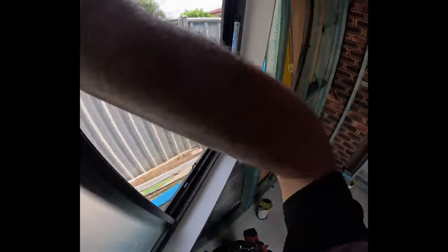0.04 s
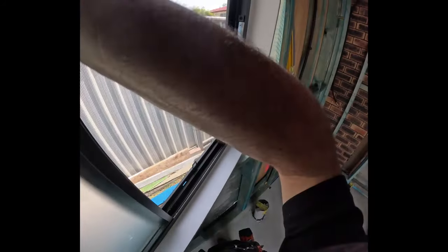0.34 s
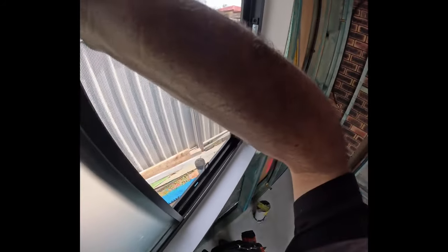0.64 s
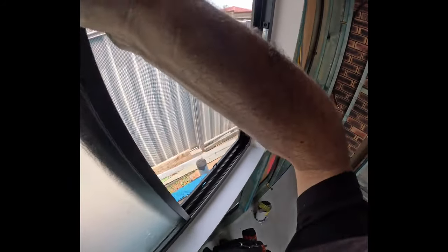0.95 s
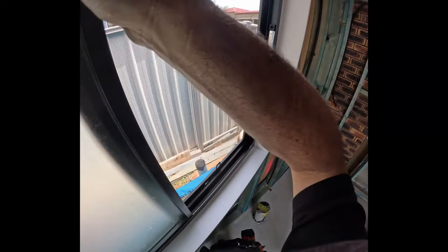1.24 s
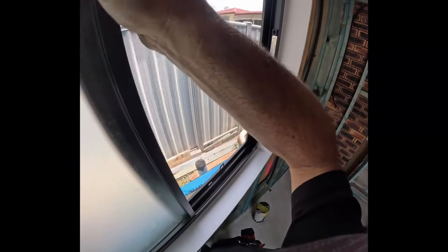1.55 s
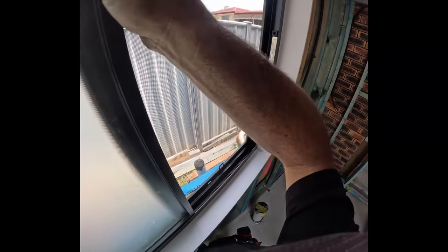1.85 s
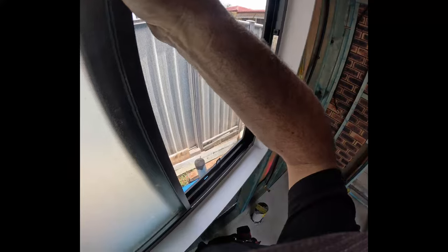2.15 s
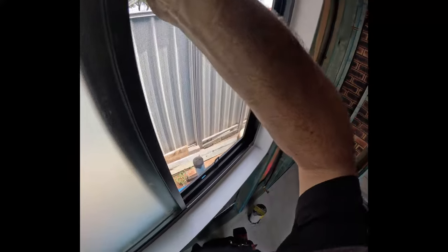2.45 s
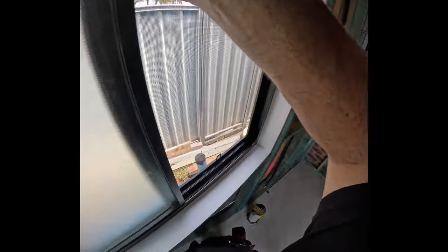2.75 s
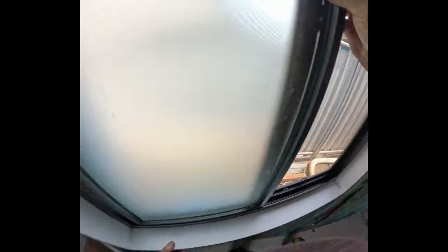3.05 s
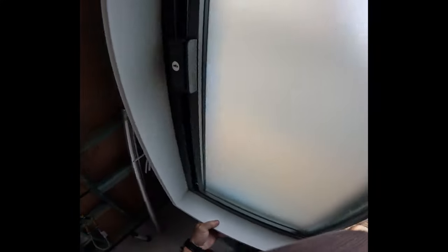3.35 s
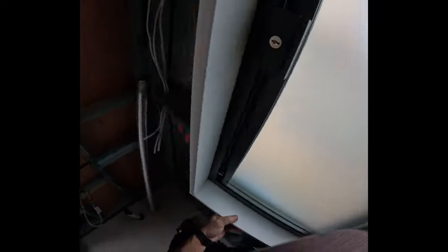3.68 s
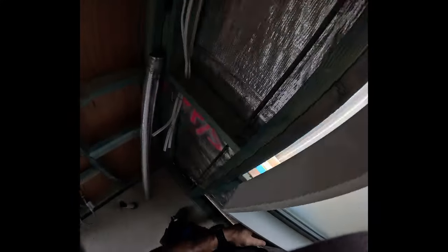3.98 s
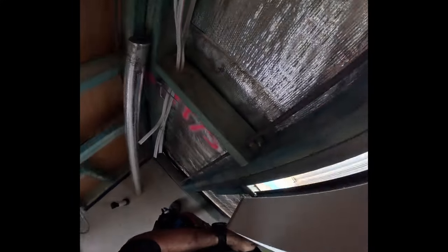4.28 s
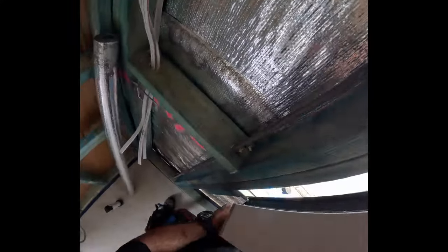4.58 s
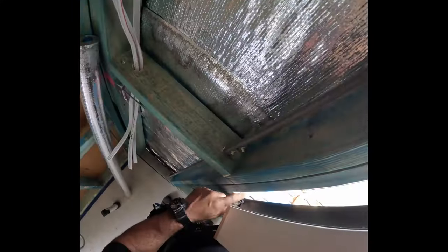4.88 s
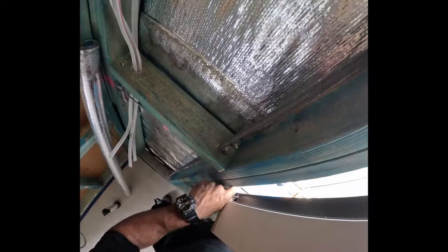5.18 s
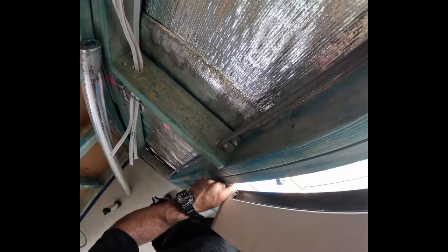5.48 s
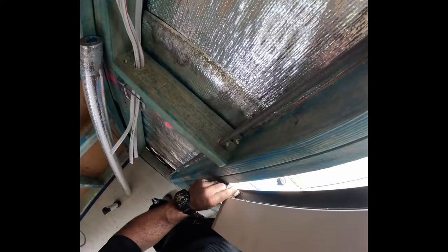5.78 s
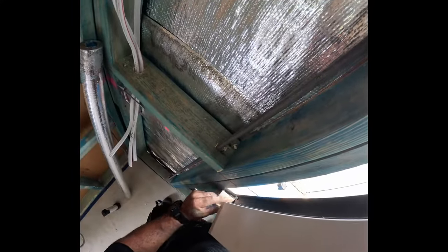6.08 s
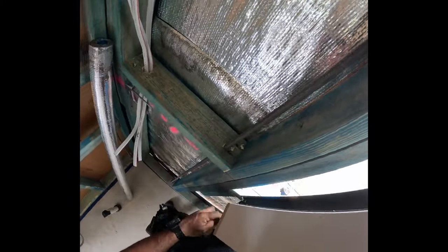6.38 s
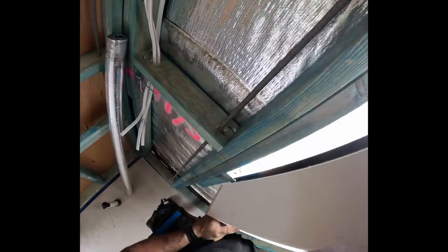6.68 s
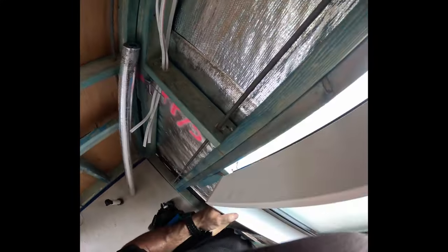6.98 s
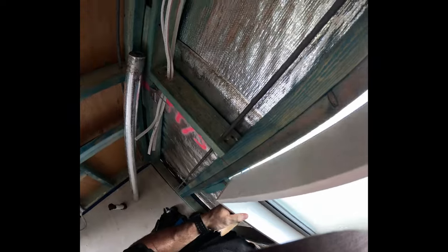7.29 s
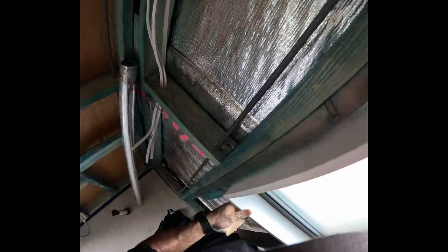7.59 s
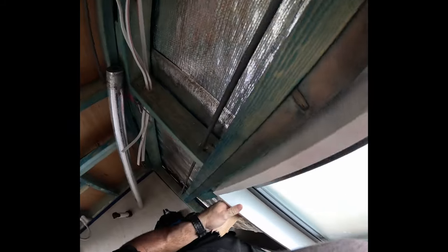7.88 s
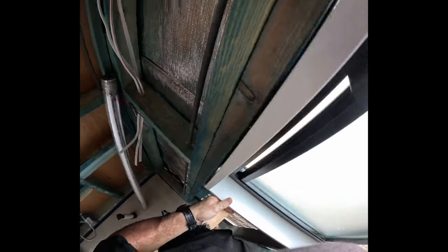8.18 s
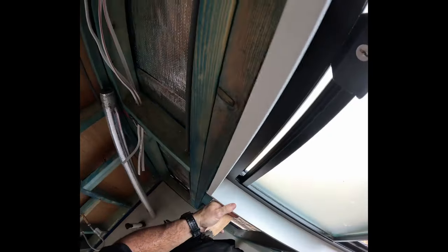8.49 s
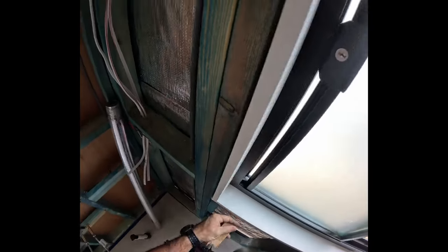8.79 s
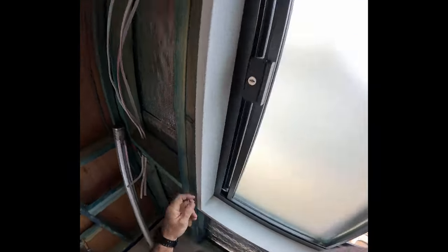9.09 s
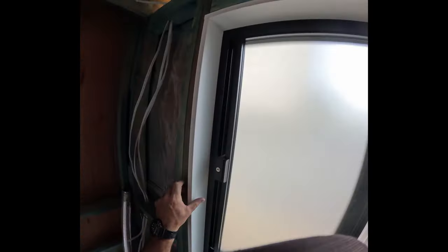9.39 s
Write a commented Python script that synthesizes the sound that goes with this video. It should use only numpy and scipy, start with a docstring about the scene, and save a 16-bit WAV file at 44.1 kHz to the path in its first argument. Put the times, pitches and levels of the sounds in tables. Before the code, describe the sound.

An aluminium window is fitted into a timber wall opening in a bare room with a low steady hum. A few dull knocks come first, then the sash glides in its track, bumps and gives short metallic chirps. Sleeves and hands rub close to a body-worn microphone. A cluster of heavy clunks makes the glass boom, and the frame scrapes home in two shoves with a thump between them, followed by light taps.

```python
"""An aluminium sliding window is lifted into a timber wall opening, close to a body-worn camera.
Impacts on the studs excite the damped modes of frame and wood, and the glass pane booms. The sash glides
and chirps in its track; by stick-slip friction the frame judders on the sill and scrapes home in two
shoves. Sleeves and hands rub near the microphone, over the low hum of a bare room."""
import sys
import numpy as np
from scipy import signal
from scipy.fft import rfft, irfft, next_fast_len
from scipy.io import wavfile

SR = 44100
rng = np.random.default_rng(int(sys.argv[2]) if len(sys.argv) > 2 else 0)


def transcribe(signal):
    """Save signal, clipped to [-1, 1], as a 16-bit WAV file at the path in sys.argv[1]."""
    frames = np.atleast_2d(signal).T
    limited = np.clip(frames, -1, 1)
    pcm = np.round(limited * 32767).astype(np.int16)
    wavfile.write(sys.argv[1], SR, pcm)


N = 425124
T = np.arange(N) / SR

def amp(db):
    return 10 ** (np.asarray(db) / 20)

def unit_rms(x):
    return x / np.sqrt(np.mean(x ** 2) + 1e-20)

def peaked(x, db):
    return amp(db) * x / abs(x).max()

def read(points, hz):
    """Interpolation on a logarithmic frequency axis."""
    f, value = np.transpose(points)
    return np.interp(np.log(hz + 1), np.log(f + 1), value)

def add(mix, s, sound):
    """Superposition: a sound joins the mix at s seconds."""
    part = mix[max(round(s * SR), 0):][:len(sound)]
    part += sound[:len(part)]

def level(s, db):
    """An amplitude envelope, silent outside its span."""
    return amp(np.interp(T, s, db, left=-120, right=-120))

def colour(x, spectrum):
    """Minimum-phase filtering to a given spectrum, at unit rms."""
    size = next_fast_len(len(x) + 4096)
    log_gain = np.log(amp(read(spectrum, abs(np.fft.fftfreq(size, 1 / SR)))))
    response = np.exp(np.conj(signal.hilbert(log_gain)))
    return unit_rms(np.fft.ifft(np.fft.fft(x, size) * response).real[:len(x)])

def resonate(x, hz, width, stages=2):
    """Unit-gain resonators in cascade, each `width` Hz wide; their centre may glide."""
    turn = np.exp(2j * np.pi * np.cumsum(hz * np.ones(len(x))) / SR)
    pole = np.exp(-np.pi * width / SR)
    for _ in range(stages):
        x = 2 * (turn * signal.lfilter([1 - pole], [1, -pole], x / turn + 1e-18)).real
    return x

def ring(modes, t):
    """Free vibration: a sum of damped modes, each falling 60 dB in its t60."""
    return sum(amp(db - 60 * t / t60) * np.sin(2 * np.pi * hz * t) * (-1) ** k
               for k, (hz, db, t60) in enumerate(modes))

def struck_anywhere(modes):
    """The point of impact sets how strongly each mode is excited."""
    return [(hz, db + 3 * rng.standard_normal(), t60) for hz, db, t60 in modes]

def diffuse_decay(t60s, size):
    """Densely overlapping modes or echoes act as noise whose bands decay at their own rates."""
    hz, t, bands = signal.stft(rng.standard_normal(size), SR, nperseg=256)
    return signal.istft(bands * amp(-60 * t / read(t60s, hz)[:, None]), SR, nperseg=256)[1][:size]

def friction(per_s, spread_db, clump_db, clump_s):
    """Friction as shot noise: tiny slips of uneven size that come in clumps."""
    slips = (rng.random(N) < per_s / SR) * rng.standard_normal(N)
    slips *= amp(spread_db * np.minimum(rng.exponential(1, N), 4))
    clumps = np.interp(T / clump_s, np.arange(N), rng.standard_normal(N))
    return unit_rms(slips * amp(clump_db * clumps))

def burst(decay_s):
    """One rough contact: exponentially decaying noise."""
    t = T[:SR // 4]
    return rng.standard_normal(len(t)) * np.exp(-t / decay_s)

def carried(lift_s=3.2, set_down_s=7.1, take_up_s=0.081):
    """Share of the frame's weight on the arms: taken up, held, set down."""
    return np.clip(np.minimum(T - lift_s, set_down_s - T) / take_up_s + .5, 0, 1)

# Spectrum of the room's hum. Each row: frequency in Hz, gain in dB.
HUM_SPECTRUM = [(20, 5.5), (43, 6), (98, 3), (166, -13), (225, -7), (275, -22.5), (470, -18), (720, -37),
                (1000, -35), (1400, -30.5), (1900, -40.5), (3000, -63)]
# Its slow drift. Each row: time in seconds, relative level in dB.
HUM_DRIFT = [(0, -38.5), (0.8, -42.5), (3.2, -36.5), (4, -43), (7, -44.5), (8.5, -39), (9.63, -40.5)]
# Droning bands. Each row: centre in Hz, resonator width in Hz, level in dB.
DRONES = [(102.2, 9, -50.5), (214, 15.3, -52.5)]
def room_hum(hum_db=-1):
    """Low broadband noise hums; narrowband noise is heard as a pitched drone."""
    broad, narrow = rng.standard_normal((2, N))
    hum = amp(np.interp(T, *np.transpose(HUM_DRIFT)) + hum_db) * colour(broad, HUM_SPECTRUM)
    return hum + sum(amp(db) * unit_rms(resonate(narrow, hz, width)) for hz, width, db in DRONES)

# Response of the camera mount. Each row: frequency in Hz, gain in dB.
MOUNT_SPECTRUM = [(60, -19.5), (125, 16), (160, 13.5), (240, -1), (300, -2.5), (450, -9.5), (750, -46.5),
                  (2500, -78)]
def handling_rumble(rest_db=-53.5, loaded_db=-45):
    """Structure-borne noise passes through the mount, louder while the arms bear the frame."""
    gain = amp(rest_db + (loaded_db - rest_db) * carried())
    return gain * colour(rng.standard_normal(N), MOUNT_SPECTRUM)

# The microphone's noise spectrum. Each row: frequency in Hz, gain in dB.
HISS_SPECTRUM = [(4500, -31), (6500, -26.5), (7600, -11.5), (8800, -1.5), (9600, 0.5), (10800, -12.5),
                 (13000, -18), (15500, -37)]
def microphone_hiss(common_db=-63, own_ratio=0.49):
    """Self-noise, shaped by the port resonance, is partly correlated between the channels."""
    common, left, right = (colour(row, HISS_SPECTRUM) for row in rng.standard_normal((3, N)))
    return amp(common_db) * (common + own_ratio * np.array([left, right]))

# Blows on the studs. Each row: start in seconds, relative blow level in dB, contact cut-off in Hz,
# relative boom level in dB, pitch of the struck member in Hz, level of its ring in dB.
BLOWS = [(0.001, -29.5, 1860, -23.5, 220, -32.5), (0.215, -32, 544, -36, 316, -33.5),
         (0.362, -29, 2140, -19, 306, -31), (0.369, -27, 1290, -30.5, 317, -31),
         (0.563, -44.5, 1100, -35, 224, -55), (1.332, -29.5, 1380, -20.5, 271, -32),
         (2.71, -17.5, 2280, -55, 306, -29), (3.101, -30, 1700, -21, 245, -45),
         (3.113, -26, 900, -30, 237, -50), (3.12, -20.5, 1260, -17, 234, -26.5),
         (3.177, -32, 2300, -39, 337, -48), (3.746, -39, 600, -28, 208, -32),
         (4.09, -24.5, 2630, -48, 602, -31), (4.75, -40, 1390, -58, 390, -41),
         (6.905, -37, 1200, -35.5, 376, -47), (7.111, -18, 2200, -19, 185, -20),
         (7.129, -15, 1270, -16.5, 122, -13), (7.134, -21, 1460, -43, 327, -24),
         (7.176, -47, 1700, -25, 138.7, -18), (7.316, -35.5, 1530, -18, 310, -29.5),
         (7.359, -52, 900, -34, 335, -36), (7.655, -30, 2200, -31, 246, -37),
         (8.074, -17, 740, -16.5, 430, -17.5), (8.084, -20.5, 2000, -56, 185, -44)]
# Modes of the glass pane and the hollow frame. Each row: frequency in Hz, gain in dB, free t60 in seconds.
PANE_MODES = [(48.5, -4, 0.33), (84.1, -7.5, 0.58), (100, -7, 0.34), (104.1, -18, 0.83), (136.5, -5, 0.29),
              (189, -23.5, 0.21)]
FRAME_MODES = [(298, -7, 0.39), (573, 3.5, 0.075), (979, 3.5, 0.32), (1110, 11.5, 0.0096),
               (1093, -0.5, 0.38), (1125, -8.5, 0.18), (1412, -8.5, 0.14), (1490, -7, 0.25),
               (1560, -9, 0.5), (1664, -6, 0.12), (2026, -13, 0.53), (2460, 2, 0.031)]
# Damping of the dense wood modes. Each row: frequency in Hz, t60 in seconds.
TIMBER_DECAY = [(100, 0.16), (400, 0.042), (1200, 0.04), (3000, 0.043), (9000, 0.011)]
# Thud of the timber lining. Each row: frequency in Hz, gain in dB.
LINING_SPECTRUM = [(60, -32), (160, 1), (310, -3), (430, -9), (800, -33), (3000, -78)]
def knocks(swell_s=0.011, travel_s=.004, member_cycles=38, grip_s=0.015, thud_s=0.028):
    """Impact excitation: harder contact reaches higher modes; pane and lining swell into a boom."""
    blows, booms, t = np.zeros(N), np.zeros(N), T[:SR // 2]
    hz = np.fft.rfftfreq(SR, 1 / SR)
    dispersion = np.exp(-4j * np.pi * travel_s * np.sqrt(1000 * hz))  # low bending waves arrive late
    for s, db, cutoff_hz, boom_db, member_hz, member_db in BLOWS:
        contact = 1 / np.hypot(1, (hz / cutoff_hz) ** 2.64)
        held = ring(struck_anywhere(FRAME_MODES), t) * np.exp(-t / grip_s)  # the hands damp the frame
        frame = irfft(rfft(held, SR) * contact)[:len(t)]
        timber = rfft(diffuse_decay(TIMBER_DECAY, len(t)), SR)
        wood = irfft(timber * unit_rms(contact) * dispersion)[SR // 1000:][:len(t)]
        member = ring([(member_hz, member_db, member_cycles / member_hz)], t) * (1 - np.exp(-t / 0.00062))
        thud = amp(-9) * colour(rng.standard_normal(len(t)), LINING_SPECTRUM) * np.exp(-t / thud_s)
        boom = (ring(PANE_MODES, t) + thud) * (1 - np.exp(-(t / swell_s) ** 2))
        add(blows, s, amp(db) * (0.44 * wood + 0.1 * frame))
        add(booms, s, member + amp(boom_db) * boom)
    return blows, booms

# Thin, high zips of cloth. Each row: time of the peak in seconds, level in dB.
CLOTH_ZIPS = [(0.205, -46), (0.255, -50), (5.2, -49), (5.85, -29)]
def cloth_zips(hz=12300, width_hz=2000, half_s=0.008):
    """A tight weave slips for an instant and radiates a band of high friction noise."""
    thread = unit_rms(resonate(rng.standard_normal(N), hz, width_hz))
    return thread * sum(amp(db) * np.exp(-.5 * ((T - s) / half_s) ** 2) for s, db in CLOTH_ZIPS)

# Strokes of sleeve and hand. Each row: time of the peak in seconds, level in dB, half length in seconds.
SLEEVE_STROKES = [(0.213, -65, 0.017), (0.297, -59.5, 0.025), (3.437, -46.5, 0.011), (4.108, -38, 0.012),
                  (4.147, -44.5, 0.024), (4.341, -51, 0.0084), (4.928, -45.5, 0.02), (5.437, -45, 0.039),
                  (5.457, -35.5, 0.0095), (5.579, -44, 0.009), (5.6346, -31.5, 0.0016), (5.664, -32, 0.012),
                  (5.818, -35, 0.036), (6.015, -38.5, 0.023), (6.08, -35.5, 0.013), (6.136, -41, 0.01),
                  (6.153, -29.5, 0.0072), (8.9, -44, 0.0065), (9.022, -46, 0.023), (9.14, -52.5, 0.016),
                  (9.604, -43.5, 0.027)]
# The sleeve's spectrum. Each row: frequency in Hz, gain in dB.
SLEEVE_SPECTRUM = [(210, 6), (749, 6.5), (2030, 1), (2930, 1), (4640, 0.5), (5520, 0), (7580, 1),
                   (8880, -2), (12200, 8), (15500, -20)]
def sleeve_strokes(spot_db=3, spot_hz=350):
    """Friction pulses: each crackling swipe of fabric is filtered by the spot it crosses."""
    slips = friction(per_s=4000, spread_db=1.8, clump_db=2.6, clump_s=0.005)
    cloth, out = colour(slips, SLEEVE_SPECTRUM), np.zeros(N)
    hz = np.fft.rfftfreq(SR, 1 / SR)
    for s, db, half_s in SLEEVE_STROKES:
        near = abs(T - s) < 4 * half_s
        spot = amp(spot_db * np.interp(hz / spot_hz, np.arange(len(hz)), rng.standard_normal(len(hz))))
        swipe = irfft(rfft(cloth[near], SR) * spot)[:near.sum()]
        out[near] += amp(db) * np.exp(-.5 * ((T[near] - s) / half_s) ** 2) * unit_rms(swipe)
    return out

# Brief, bright clicks, mostly at the onsets of sleeve strokes, knocks and scrapes.
# Each row: start in seconds, relative peak in dB.
SHARP_CLICKS = [(0.372, -37.5), (1.442, -44.5), (2.461, -30.5), (3.1, -31), (5.459, -26.5), (5.541, -32),
                (5.6315, -25.5), (5.797, -31), (5.851, -35), (6.0625, -30), (6.1351, -23), (7.1106, -23),
                (7.656, -25), (7.7031, -13.5), (8.9125, -32)]
# Spectrum of a click. Each row: frequency in Hz, gain in dB.
CLICK_SPECTRUM = [(400, -61), (1000, 10), (2500, 7), (7500, 0.5), (11000, 6.5), (15000, 2)]
def sharp_clicks(decay_s=0.0006, gain_db=2):
    """Impulsive transients: a very short broadband burst is heard as a click."""
    out = np.zeros(N)
    for s, db in SHARP_CLICKS:
        add(out, s, peaked(colour(burst(decay_s), CLICK_SPECTRUM), db + gain_db))
    return out

# Shifts of grip. Each row: start and length in seconds, relative levels of rub and swish in dB.
GRIP_SHIFTS = [(1.108, 0.22, -51.5, -76.5), (1.577, 0.26, -57.5, -79), (1.957, 0.17, -52.5, -75),
               (3.86, 0.59, -47, -63), (4.473, 0.14, -50, -71.5), (4.68, 0.47, -51, -65),
               (5.316, 0.48, -43, -61.5), (5.636, 0.68, -46, -57), (6.438, 0.32, -48.5, -54),
               (6.71, 0.44, -43, -63), (6.95, 0.59, -42.5, -66.5), (7.806, 0.49, -37, -51.5),
               (8.139, 0.054, -27, -49.5), (8.201, 0.064, -31, -54), (8.66, 0.63, -47, -55.5),
               (9.18, 0.4, -45.5, -62)]
# Spectra of the dull rub and the bright swish. Each row: frequency in Hz, gain in dB.
RUB_SPECTRUM = [(150, 5.5), (320, 7), (750, -6), (1100, 2), (1650, 0.5), (2300, -1), (3200, -11),
                (9000, -59)]
SWISH_SPECTRUM = [(1500, -27), (3200, 16.5), (5000, 13.5), (7500, 11), (10000, 11), (12500, 18),
                  (15500, -9)]
def clothes_rubbing(rub_db=-10, swish_db=1, arch_power=0.57):
    """Friction noise follows sliding speed: clothes drag on the frame in arches that add in power."""
    rub, swish = amp(-69.5) * carried(), amp(-76.5) * carried()  # the frame rests against the body
    for start, length, db, bright_db in GRIP_SHIFTS:
        progress = np.clip((T - start) / length, 0, 1)
        speed = np.maximum(np.sin(np.pi * progress), 0) ** arch_power
        rub = np.hypot(rub, amp(db + rub_db) * speed)
        swish = np.hypot(swish, amp(bright_db + swish_db) * speed)
    dull = colour(friction(per_s=3000, spread_db=1, clump_db=2.2, clump_s=.014), RUB_SPECTRUM)
    bright = colour(friction(per_s=6000, spread_db=1.5, clump_db=2, clump_s=0.014), SWISH_SPECTRUM)
    return rub * dull + swish * bright

# Taps and rattles of the frame's edge. Each row: start in seconds, peak in dB.
EDGE_TAPS = [(1.858, -58.5), (2.631, -39), (3.226, -38), (3.334, -49), (3.526, -42), (3.582, -35),
             (4.208, -43.5), (4.303, -49), (4.5, -55), (5.028, -44), (5.2, -48.5), (7.056, -35.5),
             (7.146, -29), (7.159, -44), (7.179, -40), (7.21, -48), (7.324, -38.5), (7.384, -52),
             (9.328, -31), (9.343, -41), (9.457, -54)]
# Spectrum of a tap. Each row: frequency in Hz, gain in dB.
TAP_SPECTRUM = [(500, -21), (1400, 6.5), (2000, 0.5), (4500, -14), (12000, -23)]
def edge_taps(decay_s=0.0034):
    """Light impacts on the studs give heavily damped transients."""
    out = np.zeros(N)
    for s, db in EDGE_TAPS:
        add(out, s, peaked(colour(burst(decay_s), TAP_SPECTRUM), db))
    return out

# The sash's travel. Each row: time in seconds, relative levels of glide and swish in dB.
SASH_TRAVEL = [(2.08, -74, -77), (2.142, -59, -59.5), (2.28, -47, -52.5), (2.325, -44.5, -44),
               (2.42, -53, -58.5), (2.57, -64, -65), (2.692, -51, -58), (2.88, -44.5, -49.5),
               (3.05, -51.5, -54.5), (3.24, -44.5, -51.5), (3.38, -56.5, -59.5), (3.708, -59, -58.5),
               (3.88, -61.5, -75)]
# The track's note under the rollers. Each row: time in seconds, frequency in Hz.
TRACK_NOTE = [(2.86, 1700), (3.06, 1070)]
def sash_sliding(glide_db=-1, swish_db=1, grind_db=-3, width_hz=550):
    """Rolling noise: grit crunching under the rollers drives a track resonance that sinks as they go."""
    grains = friction(per_s=1200, spread_db=1.5, clump_db=3, clump_s=0.018)
    fine = friction(per_s=7000, spread_db=1, clump_db=1, clump_s=0.014)
    hz = np.interp(T, *np.transpose(TRACK_NOTE))
    grind = amp(grind_db) * unit_rms(resonate(grains, hz, width_hz))
    glide = amp(glide_db) * colour(rng.standard_normal(N), RUB_SPECTRUM)
    s, db, bright_db = np.transpose(SASH_TRAVEL)
    return level(s, db) * (glide + grind) + level(s, bright_db + swish_db) * colour(fine, SWISH_SPECTRUM)

# Slips of the frame on the sill. Each row: start in seconds, peak in dB.
SILL_SLIPS = [(2.1115, -40), (2.1215, -37.5), (2.1555, -43), (2.173, -34.5), (2.1894, -34), (2.2043, -33),
              (2.215, -30.5), (2.2239, -32), (2.232, -32), (2.2437, -36), (2.2874, -35)]
# Modes of the sill. Each row: frequency in Hz, gain in dB, t60 in seconds.
SILL_MODES = [(1110, 8.5, 0.017), (1760, 13.5, 0.0028), (2150, -7, 0.039), (2640, 5.5, 0.0036)]
def sill_judder(slip_s=0.0021):
    """Stick-slip motion: each release is a rough burst that rings the sill."""
    out, t = np.zeros(N), T[:SR // 4]
    for s, db in SILL_SLIPS:
        slip = signal.fftconvolve(burst(slip_s), ring(SILL_MODES, t))[:len(t)]
        add(out, s, peaked(slip, db))
    return out

# The sash shifting in its track. Each row: start in seconds, click peak in dB, latch ring in dB.
SASH_CHIRPS = [(3.607, -41, -44), (3.6584, -24.5, -48), (3.672, -27.5, -58), (3.698, -30.5, -58),
               (3.7465, -28.5, -29), (3.9976, -42.5, -42)]
# Modes of the aluminium track. Each row: frequency in Hz, gain in dB, t60 in seconds.
TRACK_MODES = [(2988, -4, 0.0061), (3260, -4, 0.0082), (4370, 2, 0.0025), (5330, -1.5, 0.005),
               (5680, 2, 0.0053), (7860, 0.5, 0.0022), (10500, 9, 0.0014)]
def sash_chirps(slip_s=0.0026, latch_hz=5850, latch_t60=0.022):
    """Transient excitation: a short slip rings the track's damped modes and the latch."""
    out, t = np.zeros(N), T[:SR // 4]
    for s, db, latch_db in SASH_CHIRPS:
        track = ring(struck_anywhere(TRACK_MODES), t)
        add(out, s, peaked(signal.fftconvolve(burst(slip_s), track), db))
        add(out, s, ring([(latch_hz, latch_db, latch_t60)], t))
    return out

# The hand catching on the rim. Each row: start in seconds, peak in dB, decay time in seconds.
HAND_CATCHES = [(6.5284, -25, 0.0015), (6.541, -34, 0.008), (6.5507, -30, 0.006), (6.572, -46, 0.0018),
                (6.5932, -28.5, 0.0009), (6.627, -31, 0.005), (6.6478, -28, 0.001), (6.672, -28, 0.0062)]
# Resonances of the thin rim. Each row: centre in Hz, resonator width in Hz, gain in dB.
RIM_RESONANCES = [(1400, 450, -11), (1950, 500, -7), (2500, 520, 1), (3650, 600, -11), (4500, 400, -12),
                  (5750, 1100, -9), (7000, 1300, -10), (10500, 2500, -8)]
def rim_catches(scratch_db=-24, spot_db=2):
    """Forced resonance: each slip of the hand drives the rim in a new balance, over a faint scratch."""
    out = np.zeros(N)
    for s, peak_db, decay_s in HAND_CATCHES:
        slip = burst(decay_s)
        rim = sum(amp(db + spot_db * rng.standard_normal()) * resonate(slip, hz, width)
                  for hz, width, db in RIM_RESONANCES)
        add(out, s, peaked(amp(scratch_db) * slip + rim, peak_db))
    return out

# The frame dragging on timber, one list a shove. Each row: time in seconds, relative level in dB,
# contact resonance in Hz, relative grit level in dB.
SHOVE_PATHS = [
    [(7.52, -71, 1620, -78), (7.568, -50, 1630, -41), (7.615, -44, 2920, -40), (7.648, -35, 2280, -41.5),
     (7.68, -45.5, 2040, -49), (7.715, -34.5, 1760, -43), (7.75, -24.5, 1230, -34.5),
     (7.82, -26.5, 1070, -35), (7.845, -34.5, 1190, -38), (7.87, -57, 1290, -47)],
    [(8.29, -65, 1880, -72), (8.312, -48.5, 2000, -47.5), (8.35, -55, 2230, -49), (8.362, -38.5, 2070, -41),
     (8.44, -32, 1960, -35), (8.6, -28, 1420, -29.5), (8.66, -27, 1250, -29.5), (8.73, -33, 1420, -37.5),
     (8.77, -39, 1290, -46), (8.8, -75, 1240, -46)],
]
# The stud's stick-slip buzz. Each entry: relative strength in dB for one shove.
SHOVE_CHATTER = [-16, -22]
# Spectra of the grit and of the groaning stud. Each row: frequency in Hz, gain in dB.
GRIT_SPECTRUM = [(1760, -10.5), (3000, -2), (3790, -2.5), (6080, -4), (7630, -5.5), (9560, -4), (12200, 1),
                 (15500, -23.5)]
GROAN_SPECTRUM = [(120, -4.5), (250, -6.5), (350, 1), (750, -1.5), (1100, 4.5), (5000, -83)]
def shove(path, chatter_db, width_hz=1500, overtone_ratio=2.63):
    """Stick-slip of metal on sawn timber: resonances sink as the contact firms, and the stud chatters."""
    s, db, contact_hz, grit_db = np.transpose(path)
    chatter = amp(chatter_db) * unit_rms(resonate(rng.standard_normal(N), hz=250, width=70))
    slips = friction(per_s=9000, spread_db=0, clump_db=1.5, clump_s=0.003)
    slips *= np.exp(chatter)  # the slips bunch on each chatter cycle
    hz = np.interp(T, s, contact_hz)
    high_pass = signal.butter(3, 850, "high", fs=SR, output="sos")
    scrape = unit_rms(signal.sosfilt(high_pass, resonate(slips, hz, width_hz)))
    frame = unit_rms(signal.oaconvolve(scrape, ring(FRAME_MODES, T[:SR // 4]))[:N])
    groan = colour(slips, GROAN_SPECTRUM)
    body = amp(-1) * scrape + amp(-13) * frame + amp(-11) * groan + .5 * chatter
    fizz = colour(slips, GRIT_SPECTRUM)
    overtone = unit_rms(resonate(fizz, overtone_ratio * hz, width_hz, stages=1))
    return level(s, db) * body + level(s, grit_db - 3.5) * unit_rms(fizz + amp(-5) * overtone)

# Reverberation of the bare room. Each row: frequency in Hz, t60 in seconds.
ROOM_DECAY = [(80, 0.4), (300, 0.45), (1500, 0.32), (5000, 0.25), (12000, 0.33)]
def in_room(x, left_db, wet_db=-12, lag_s=.00001, apart_hz=900):
    """Direct sound reaches two ports with level and time differences; a diffuse field adds echoes."""
    size = next_fast_len(N + SR // 2)
    hz, t = np.fft.rfftfreq(size, 1 / SR), T[:SR // 2]
    near_walls = (1 + 0.71 * np.exp(-t / 0.024)) * (t > .001)  # pane and studs are within arm's reach
    common, left, right = (rfft(diffuse_decay(ROOM_DECAY, len(t)) * near_walls, size) for _ in range(3))
    apart = hz / np.hypot(hz, apart_hz)  # long waves reach both ports alike
    echoes = np.sqrt(1 - apart ** 2) * common + apart * np.array([left, right])
    echoes /= np.sqrt(np.mean(abs(echoes[:, hz < 4000]) ** 2))
    sides = np.array([[1], [-1]])
    direct = amp(sides * left_db / 2) * np.exp(-1j * np.pi * sides * hz * lag_s)
    return irfft(rfft(x, size) * (direct + amp(wet_db) * echoes), size)[:, :N]

def scatter(x, side_db, apart_hz=1200):
    """Scattering off the moving pane and arms decorrelates the treble at the two ports."""
    hz, _, bands = signal.stft(x, SR, nperseg=256)
    bands = bands * (hz / np.hypot(hz, apart_hz))[:, None] * np.exp(2j * np.pi * rng.random(bands.shape))
    return amp(side_db) * np.array([[1], [-1]]) * signal.istft(bands, SR, nperseg=256)[1][:N]

def scene():
    """Superposition of the sources and their reflections at the two ports."""
    scrapes = sum(shove(path, db) for path, db in zip(SHOVE_PATHS, SHOVE_CHATTER))
    rustle = sash_sliding() + clothes_rubbing() + sleeve_strokes() + cloth_zips()
    blows, booms = knocks()
    mix = in_room(blows, left_db=2, wet_db=-2.5) + in_room(booms, left_db=-1)
    mix += in_room(scrapes, left_db=-2.5, lag_s=.00002) + scatter(scrapes, side_db=-8.5)
    mix += in_room(rustle, left_db=0.5) + scatter(rustle, side_db=-3)
    clicks = sash_chirps() + sharp_clicks() + edge_taps() + rim_catches() + sill_judder()
    mix += in_room(clicks, left_db=0, wet_db=1)
    return mix + room_hum() + handling_rumble() + microphone_hiss()

# Responses of the ports, unlike in the top treble. Each row: frequency in Hz, gain in dB.
LEFT_RESPONSE = [(8000, 7), (11000, -8.5), (14000, -13), (15500, -23)]
RIGHT_RESPONSE = [(8000, 6), (11000, -13), (14000, -18), (15500, -10)]
def record(dry, edge_hz=15600):
    """Linear filtering: each port colours its channel, then a low-pass limits the band."""
    hz = np.fft.rfftfreq(N, 1 / SR)
    heard = irfft(rfft(dry) * amp([read(LEFT_RESPONSE, hz), read(RIGHT_RESPONSE, hz)]), N)
    low_pass = signal.firwin(511, edge_hz, window=("kaiser", 9), fs=SR)
    return signal.oaconvolve(heard, low_pass[None], "same")

dry = scene()
out = record(dry)
transcribe(out)
```